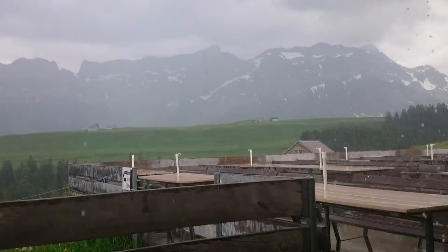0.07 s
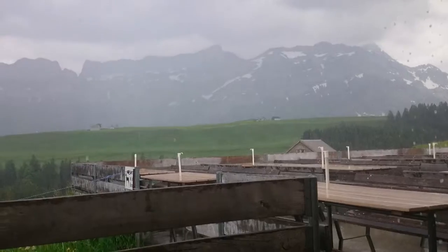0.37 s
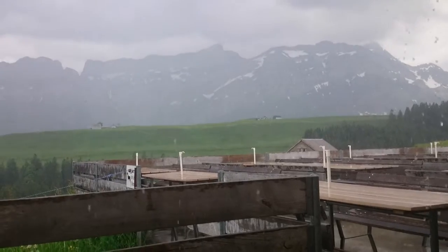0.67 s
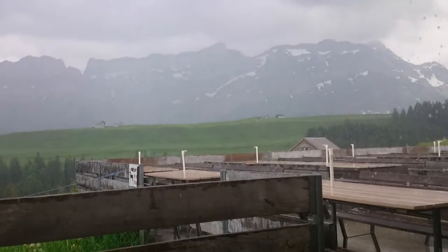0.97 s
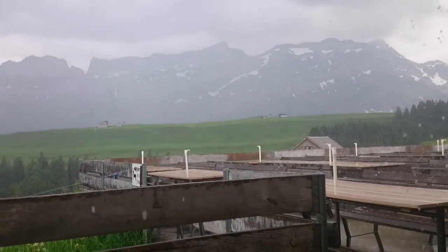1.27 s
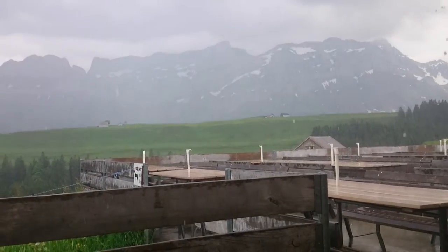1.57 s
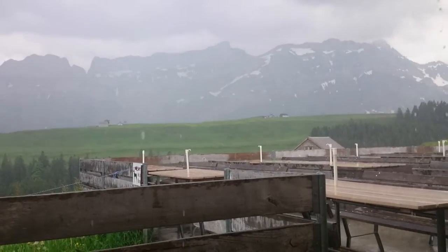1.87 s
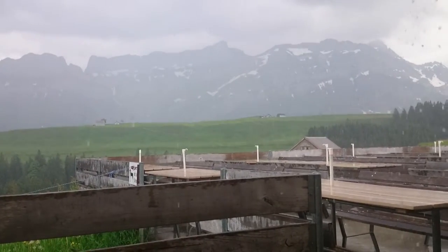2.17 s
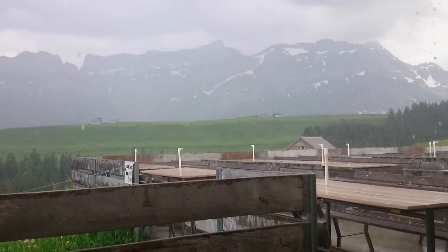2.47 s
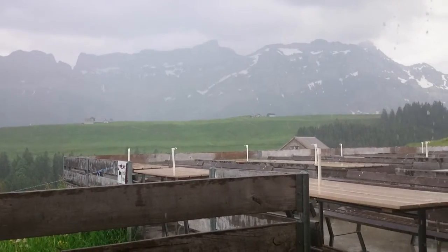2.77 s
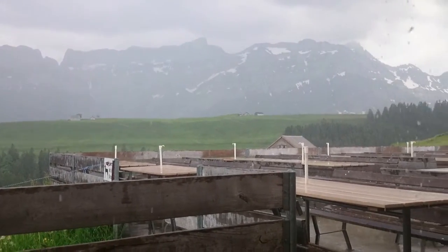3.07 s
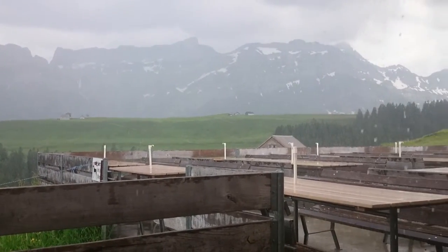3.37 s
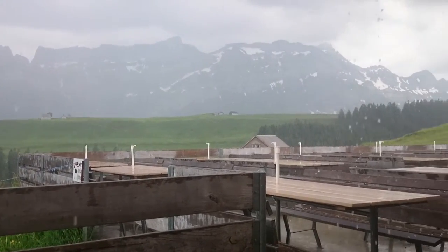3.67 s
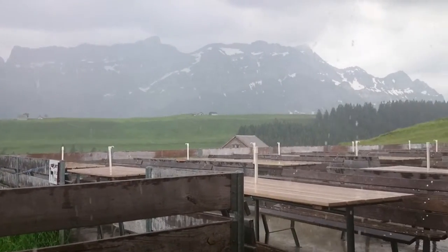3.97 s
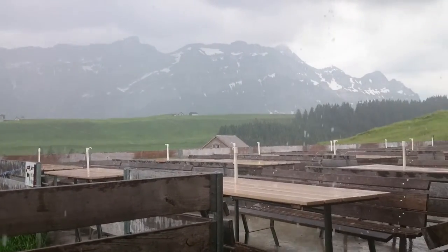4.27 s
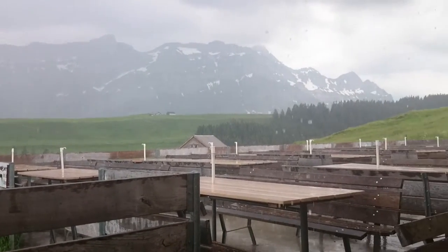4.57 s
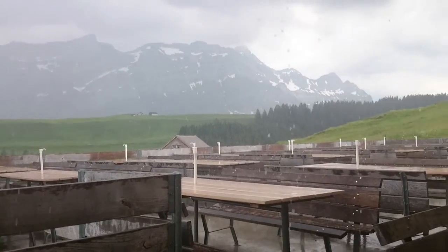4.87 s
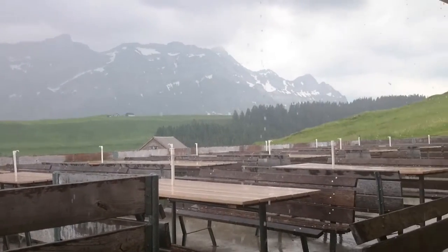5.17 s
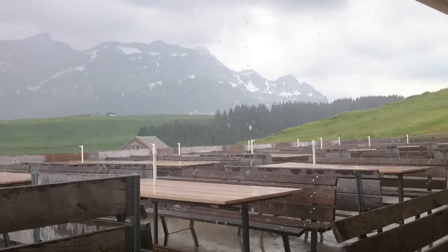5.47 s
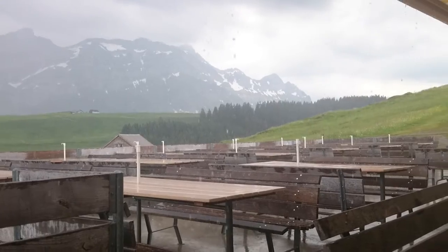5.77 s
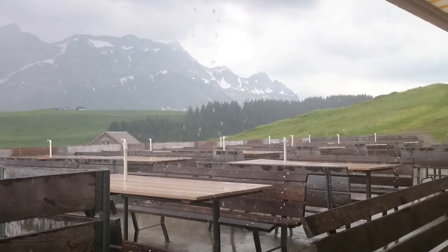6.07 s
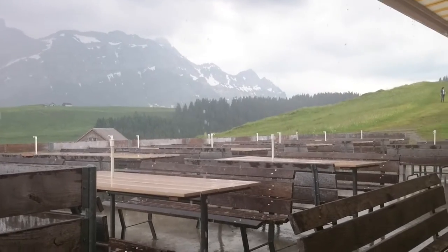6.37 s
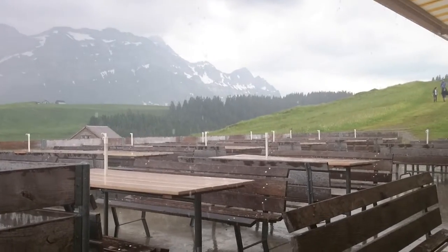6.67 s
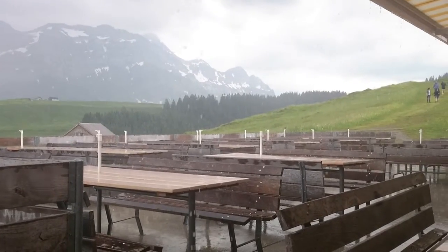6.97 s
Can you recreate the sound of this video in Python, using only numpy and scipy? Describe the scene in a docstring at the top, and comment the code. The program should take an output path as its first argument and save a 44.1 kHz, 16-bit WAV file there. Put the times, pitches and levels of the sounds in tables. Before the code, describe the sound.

Rain heard from under a terrace awning: drops thump the cloth, tick on tables and splat onto wet paving.

```python
"""After a short silence, steady rain on a mountain terrace fades in, heard from under an awning.
From the start, drops drum on the cloth and patter on wooden tables and paving, runoff splats down
from the edge, and the meadows hiss. Then flurries pass and heavy drops thud overhead. Midway come a
soft deep bump and one drip into a puddle, later a fainter bump. All along the rain slowly eases,
and two microphone ports (sound openings) a hand apart each add their own treble ring."""
import sys
import numpy as np
from scipy import signal
from scipy.fft import rfft, irfft
from scipy.io import wavfile
from scipy.ndimage import map_coordinates

SR = 44100
rng = np.random.default_rng(int(sys.argv[2]) if len(sys.argv) > 2 else 0)


def persist_wave(psi):
    """Save psi, clipped to +-1, as 16-bit WAV."""
    counts = np.round(np.clip(psi, -1, 1) * 32767).astype(np.int16)
    wavfile.write(sys.argv[1], SR, np.atleast_2d(counts).T)


N = 313992


# heavy drops on the awning: (time [s], relative level [dB])
HEAVY_DROPS = [(1.734, -4), (1.815, -4), (2.518, -8), (3.358, -3), (4.214, -6), (4.246, -2), (5.206, -4),
               (6.148, -10)]
# the tone of a drop on tight cloth: (frequency [Hz], level [dB])
CLOTH_TONE = [(25, -33), (42, -25), (56, -7), (80, -6), (140, -.8), (240, -0.26), (330, 0.04), (430, -1.7),
              (600, 0), (800, -4.5), (1180, -2), (1600, -10), (2300, -12.5), (5000, -30.5)]
# the notes the awning rings at: (pitch [Hz], level [dB], time to fade by 60 dB [s])
AWNING_NOTES = [(163, -62.5, 0.2), (181.5, -55, 0.17), (493, -60, 0.13), (576, -55.5, 0.074),
                (638, -55, 0.14)]

def awning(level_db):
    """Drops thump the cloth overhead and keep it ringing like a drum skin."""
    strength = amp(level_db + 14.5 + 0.32 * wobble(14))
    drops = strength * shower(per_second=1600, scatter_db=2.5, width_db=0.5)
    times, heavy_db = np.transpose(HEAVY_DROPS)
    heavy = impacts(times, amp(heavy_db + 18), side=rng.random(len(times)) - .5, pan_db=0)
    thumps = ring(drops - heavy, body(CLOTH_TONE))
    t = np.arange(SR // 3) / SR
    notes = sum(amp(db - 60 * t / fade_s) * np.cos(2 * np.pi * hz * t) for hz, db, fade_s in AWNING_NOTES)
    return terrace_echo(thumps + ring(thumps, notes), wet_db=-13.5)


# loud splats: (time [s], relative level [dB], left over right [dB], spray boost [dB])
LOUD_SPLATS = [(1.205, -13.5, -6, 3), (1.312, -10, -6, 2), (1.693, -9, 1, 1), (1.837, -10, -4, -1),
               (2.104, -5.5, -4, -2), (2.251, -10, -7, -3.5), (2.469, -8, -6, -2.5), (2.479, -9, -3, 1),
               (2.905, -8, -1, -2.5), (2.99, -13.5, -3, 0), (3.2, -6.5, -2, -1), (3.725, -2, 1, -0.7),
               (3.804, -9.5, -3, 0.5), (3.887, -15, -1, 1), (4.052, -10, -4, -4), (4.523, -13, -4, -1),
               (4.586, -8.5, 2, 2), (4.785, -13.5, -3, 1), (4.887, -8.5, -4, -3), (5.115, -13, -3, 1),
               (5.293, -13, -4, 1), (5.647, -7, 2, -3), (5.902, -6, 6, -1.5), (6.154, -11, -5, -4),
               (6.339, -10, 0, 0.5), (6.598, -12, 6, 1), (6.703, -7, 0, -2), (7.0, -10, 2, 0),
               (7.09, -11, 2, -1)]
# the tone of a fat drop bursting on wet paving: (frequency [Hz], level [dB])
SPLAT_TONE = [(100, -37), (800, -0.5), (2000, -4), (3300, 2), (6000, -0.5), (10000, -2.5), (16000, -18)]

def runoff(level_db, per_second):
    """Fat drops fall from the awning's edge: a few loud splats among many smaller ones."""
    when, size, pan = rng.random((int(per_second * N / SR), 3)).T
    db = level_db[(when * N).astype(int)] + 8 + 6 * size
    small_splats = np.column_stack([when * N / SR, db, 5 * (pan - .6), np.full_like(db, -3.5)])
    loud = amp(1.6) * splash(LOUD_SPLATS, spray_s=.011, flight_s=.023)
    small = splash(small_splats, spray_s=.011, flight_s=.03)
    return ring(terrace_echo(loud + small, wet_db=-6.5), body(SPLAT_TONE))


def splash(rows, spray_s, flight_s, droplets=140):
    """Each drop slaps down and fizzes as it tears into droplets; some of them land later."""
    start, db, pan_db, spray_db = np.transpose(rows)[:, :, None]
    delay, side, size, chance = rng.random((len(rows), 4, droplets)).transpose(1, 0, 2)
    slap = impacts(start, amp(db), 2 * side[:, :1] - 1, pan_db)
    falls_back = chance < .3
    times = start + np.where(falls_back, -np.log(1 - delay) * flight_s, delay ** 1.25 * spray_s)
    sizes = amp(db + spray_db) * (2 * size - 1) * np.where(falls_back, .45, .9) * (1 - delay / 2)
    return slap + impacts(times, sizes, 2 * side - 1, pan_db)


# the tone of a drop on wet wood and stone: (frequency [Hz], level [dB])
PATTER_TONE = [(25, -54), (60, -43), (300, -11.5), (800, 6.5), (1600, -.5), (2500, 3), (5000, -2),
               (10000, -3), (16000, -4.5)]

def patter(level_db):
    """Near drops tick on tables and paving in surges; countless far ones blend into an even hiss."""
    strength = amp(level_db - 0.43 + 1.21 * wobble(30))
    near = strength * shower(per_second=3300, scatter_db=2.5, width_db=5)
    far = amp(-29.5) * shower(per_second=20000, scatter_db=-0.5, width_db=-3.5)
    return ring(terrace_echo(near, wet_db=-7.5) + far, body(PATTER_TONE))


# a drip into a puddle: (time [s], level [dB], starting pitch [Hz])
DRIPS = [(3.367, -14, 2150)]

def puddle_drip():
    """A drip traps a bubble of air, which rings and rises in pitch as it dies away."""
    track, t = np.zeros(N + SR), np.arange(SR // 10) / SR
    loudness = amp(-60 * t / .025) * (1 - np.exp(-t / .0015))
    for start, db, hz in DRIPS:
        bubble = np.sin(2 * np.pi * hz * t * (1 + 4 * t))
        track[round(start * SR):][:len(t)] += amp(db) * loudness * bubble
    return track[:N]


# soft bumps in the deep bass: (time [s], relative level [dB])
DEEP_BUMPS = [(2.679, -28), (5.489, -38)]

def bumps():
    """Brief low thumps, each dying away within a few vibrations."""
    times, db = np.transpose(DEEP_BUMPS)
    t = np.arange(SR // 4) / SR
    thump = np.sin(2 * np.pi * 44 * t) * amp(-60 * t / .2) * (1 - np.exp(-t / 0.0081))
    return ring(impacts(times, amp(db + 6), side=0, pan_db=0), thump)


# how long floor, wall and awning echo: (frequency [Hz], time to fade by 60 dB [s])
ECHO_TIMES = [(150, 0.2), (2000, 0.15), (12000, 0.092)]

def terrace_echo(x, wet_db, count=36):
    """Nearby surfaces add a short echo, which keeps changing as drops land in new places."""
    hz, t, noise = signal.stft(rng.standard_normal((count, 2, SR // 5)), SR, nperseg=256)
    fading = amp(-60 * t / along(ECHO_TIMES, hz)[:, None])
    tails = signal.istft(noise * fading, SR, nperseg=256)[1]
    echo, step = np.zeros((2, N + SR)), N // count + 1
    for k, tail in enumerate(tails):
        piece = x[:, k * step:(k + 1) * step]
        answer = signal.fftconvolve(piece, tail / np.linalg.norm(tail[0]), axes=1)
        echo[:, k * step:][:, :answer.shape[1]] += answer
    return x + amp(wet_db) * echo[:, :N]


def shower(per_second, scatter_db, width_db):
    """Clicks of big and small drops from all around, scaled to an average (rms) level of 1."""
    when, direction, sign, size = rng.random((int(per_second * N / SR), 4)).T
    sizes = np.sign(sign - .5) * amp(-scatter_db * np.log(size + 0.04))
    side = np.sin(2 * np.pi * direction)
    clicks = impacts(when * N / SR, sizes, side, width_db * side)
    return clicks / np.sqrt(np.mean(clicks ** 2) + 1e-20)


def impacts(times, sizes, side, pan_db, port_delay_s=.00032):
    """One click per hit; side (-1 right, 1 left) decides which port hears it first."""
    pair = []
    for port in (1, -1):
        at = np.round((times - port * side * port_delay_s / 2) * SR).astype(int)
        heights = sizes * amp(port * pan_db / 2)
        pair.append(np.bincount(np.clip(at, 0, N).ravel(), heights.ravel(), N + 1)[:N])
    return np.array(pair)


def rainfall(flurries, start_db, ease_db_per_s, rise_s=0.034, fall_s=0.045):
    """The rain's relative strength in dB: slowly easing, with a brief swell for each flurry."""
    t = np.arange(N) / SR
    peak_s, db = np.transpose(flurries)[:, :, None]
    width_s = np.where(t < peak_s, rise_s, fall_s)
    swells = db * np.exp(-((t - peak_s) / width_s) ** 2)
    return start_db - ease_db_per_s * t + swells.sum(axis=0)


def body(tone, size=8192):
    """The sound of one sharp tap on something with this tone."""
    gains = amp(along(tone, np.fft.rfftfreq(size, 1 / SR)))
    cepstrum = irfft(np.log(gains))
    fold = np.r_[1, np.full(size // 2 - 1, 2), np.zeros(size // 2)]  # nothing sounds before the tap
    return irfft(np.exp(rfft(cepstrum * fold)))[:size // 2]


def ring(x, response):
    """Make every click in both channels ring with this response."""
    return signal.fftconvolve(x, np.atleast_2d(response), axes=1)[:, :N]


def along(points, hz):
    """Read between a table's rows, with octaves evenly spaced."""
    frequencies, values = np.transpose(points)
    return np.interp(np.log(hz + 1), np.log(frequencies + 1), values)


def wobble(rate):
    """A smooth curve through rate random points a second."""
    return map_coordinates(rng.standard_normal(int(N * rate / SR) + 4), [np.arange(N) * rate / SR])


def amp(db):
    """Turn decibels into a multiplier."""
    return 10 ** (np.asarray(db) / 20)


# flurries of drops crossing the awning: (time [s], swell [dB])
DRUM_FLURRIES = [(1.75, 3), (2.12, 3.2), (2.73, 1.5), (3.44, 2.5), (3.59, 2), (4.06, 1.5), (4.23, 0.5),
                 (4.5, 2.5), (5.19, 1.5), (5.67, 1.7), (5.89, 3), (6.16, 3.6)]
# flurries sweeping the tables and paving: (time [s], swell [dB])
PATTER_FLURRIES = [(1.52, 2.7), (2.13, 2), (2.48, 2), (3.4, 3), (3.63, 3.8), (4.06, 2.5), (4.56, 1.5),
                   (4.82, 2), (5.31, 3), (5.47, 1), (5.63, 2), (6.21, 1.5), (6.63, 2.5)]

def scene():
    """Drumming overhead, splats and patter all around."""
    drum_db = rainfall(DRUM_FLURRIES, start_db=-26, ease_db_per_s=0.14)
    patter_db = rainfall(PATTER_FLURRIES, start_db=-23.5, ease_db_per_s=0.19)
    ground = patter(patter_db) + runoff(patter_db, per_second=22) + puddle_drip()
    return awning(drum_db) + ground + bumps()


# the tone of the left microphone port: (frequency [Hz], level [dB])
LEFT_TONE = [(35, -6.5), (90, -4), (200, -1.5), (550, 0.5), (2000, 0.5), (3200, 2), (4000, 10), (5200, 1.3),
             (6500, -0.5), (8300, 3), (10200, -7), (13300, -2), (15000, -29)]
# the tone of the right microphone port: (frequency [Hz], level [dB])
RIGHT_TONE = [(2000, 1.1), (3000, -0.5), (4700, 3.5), (5200, 10), (5730, 18), (6600, 11), (8200, 3.5),
              (10200, -7), (11500, -2.5), (13500, -2.5), (15400, 2)]

def record(dry, silence_s=0.58, fade_s=0.6, top_hz=15780):
    """The ports ring, loud peaks are rounded off, the sound fades in and the highest treble is cut."""
    heard = ring(dry, [body(LEFT_TONE), body(RIGHT_TONE)])
    rounded = heard / (1 + (heard / .85) ** 6) ** (1 / 6)
    fade_in = np.clip((np.arange(N) / SR - silence_s) / fade_s, 0, 1) ** 2
    low_pass = signal.firwin(1001, top_hz, window="blackman", fs=SR)
    return signal.fftconvolve(rounded * fade_in, low_pass[None], "same", axes=1)


dry = scene()
out = record(dry)
persist_wave(out)
```